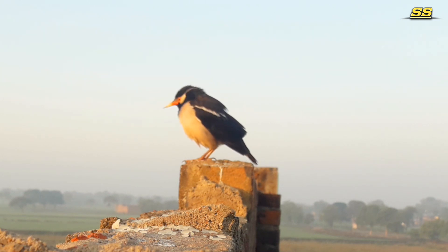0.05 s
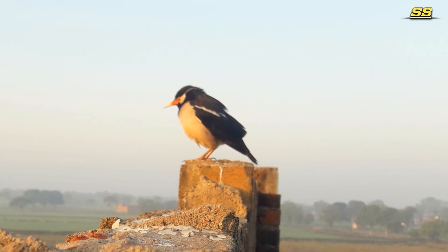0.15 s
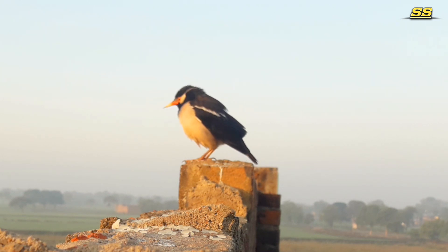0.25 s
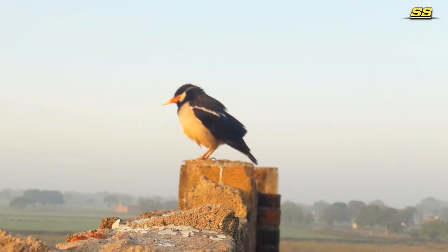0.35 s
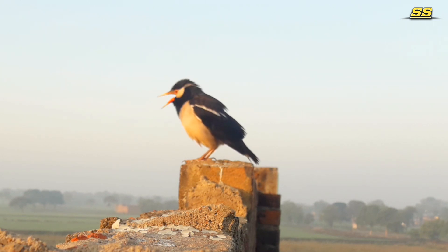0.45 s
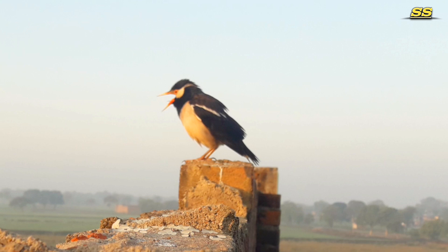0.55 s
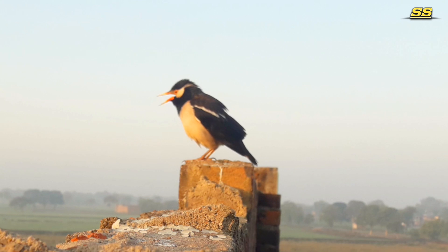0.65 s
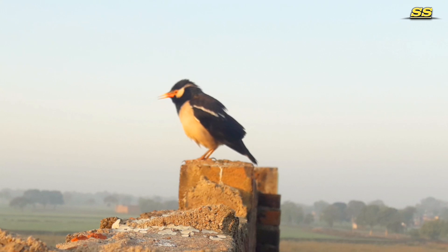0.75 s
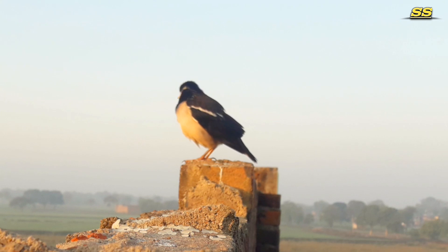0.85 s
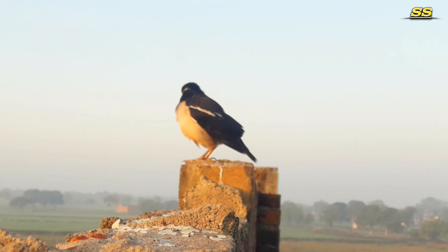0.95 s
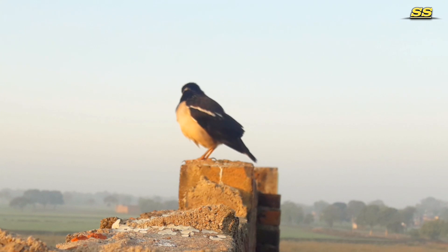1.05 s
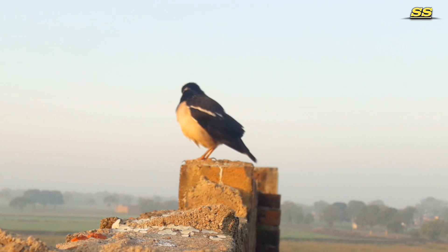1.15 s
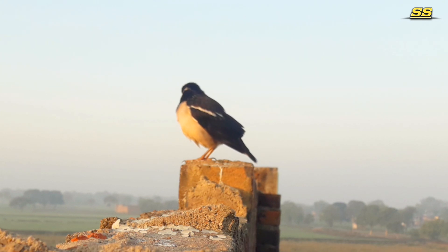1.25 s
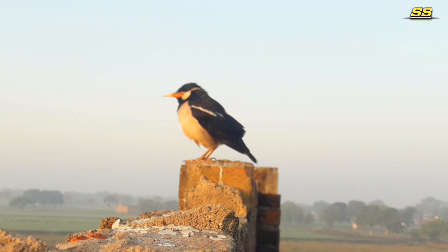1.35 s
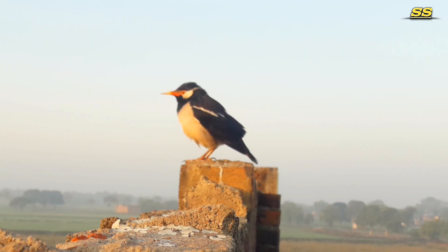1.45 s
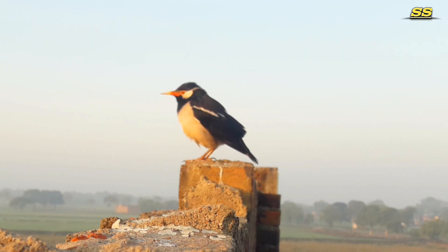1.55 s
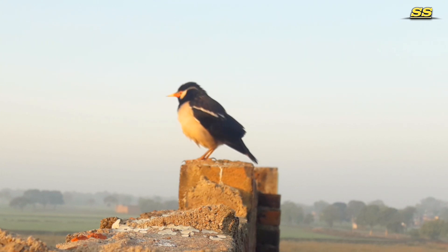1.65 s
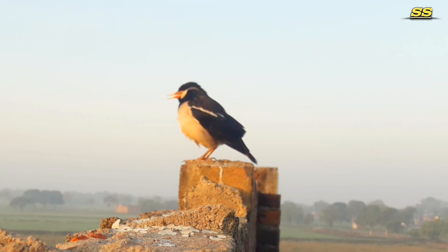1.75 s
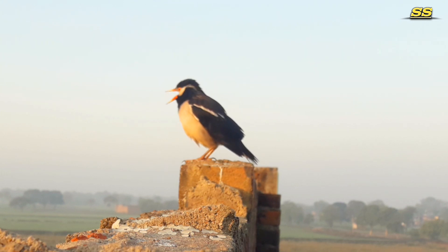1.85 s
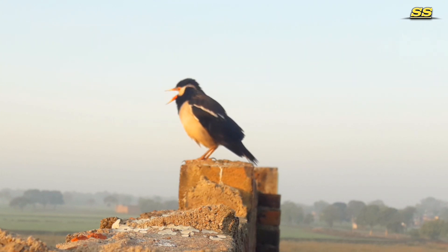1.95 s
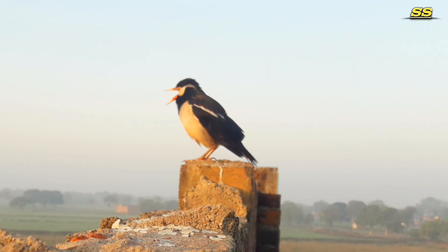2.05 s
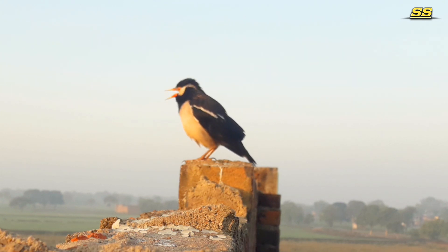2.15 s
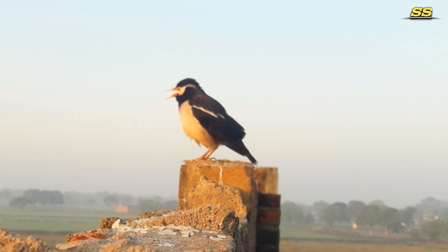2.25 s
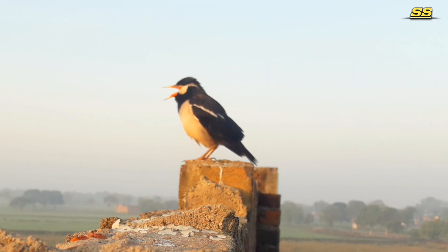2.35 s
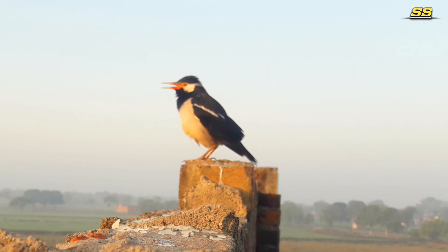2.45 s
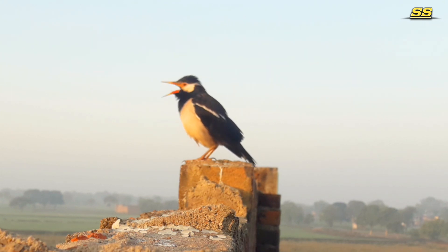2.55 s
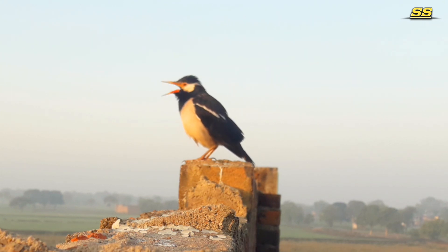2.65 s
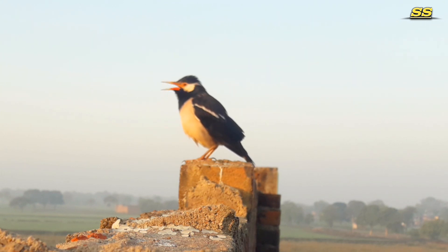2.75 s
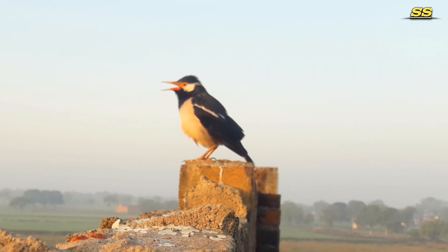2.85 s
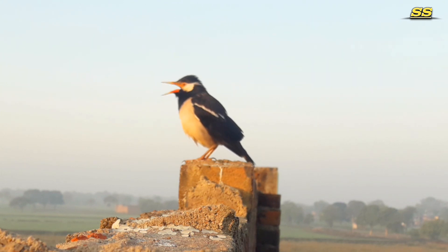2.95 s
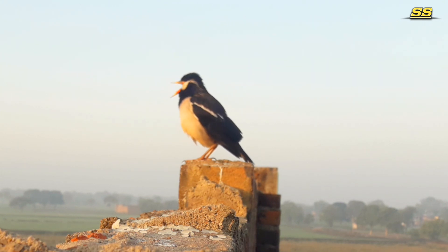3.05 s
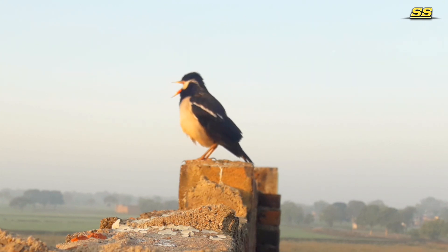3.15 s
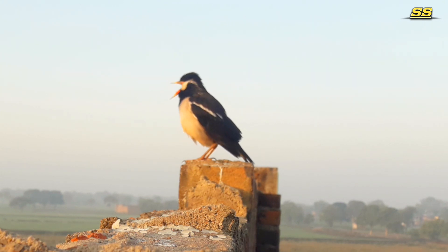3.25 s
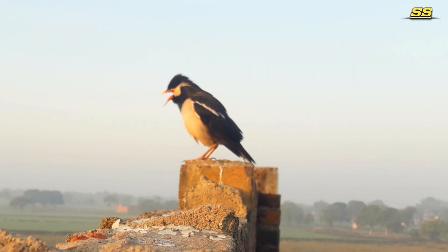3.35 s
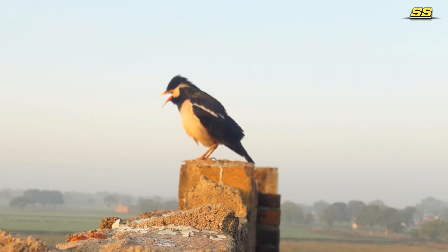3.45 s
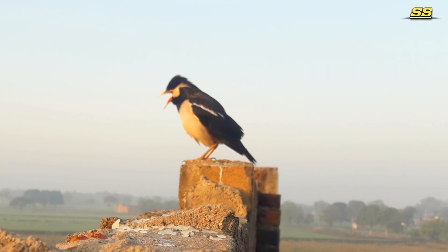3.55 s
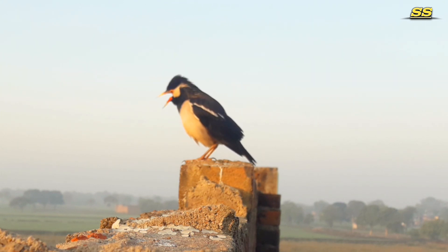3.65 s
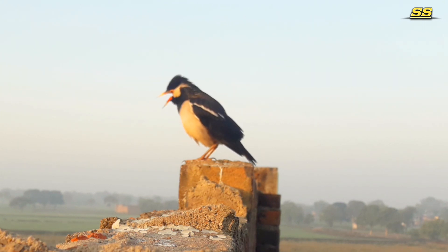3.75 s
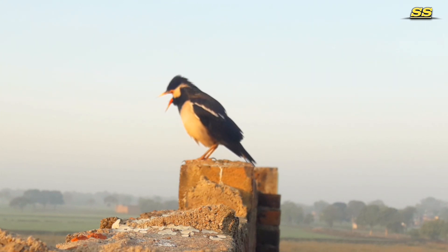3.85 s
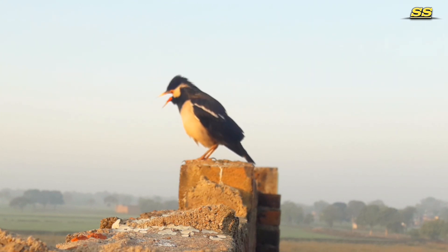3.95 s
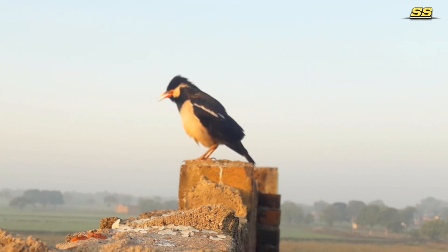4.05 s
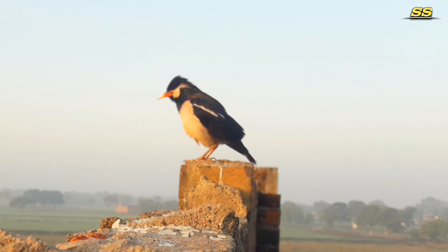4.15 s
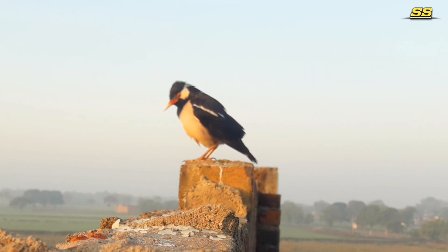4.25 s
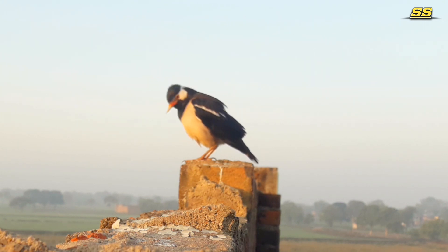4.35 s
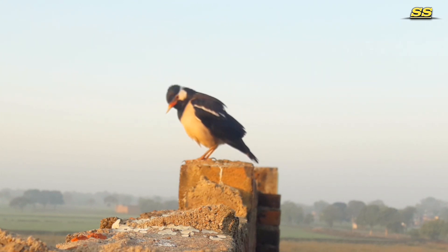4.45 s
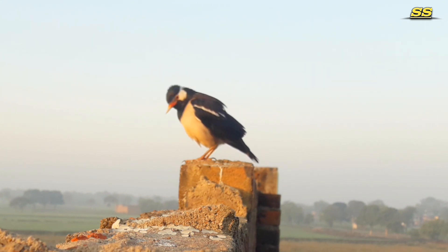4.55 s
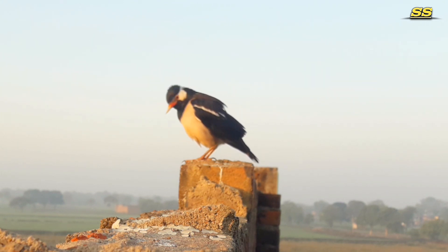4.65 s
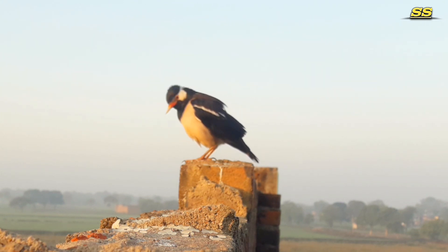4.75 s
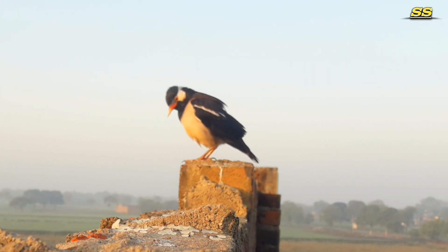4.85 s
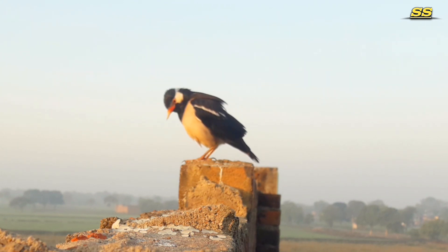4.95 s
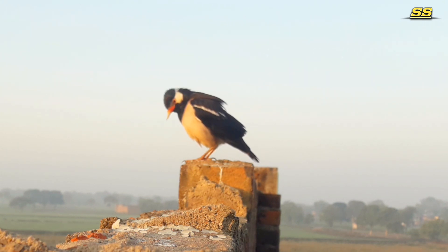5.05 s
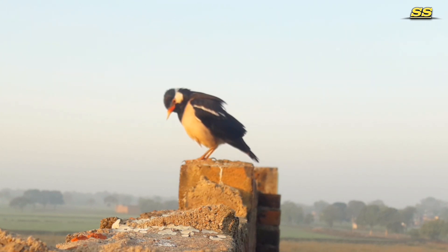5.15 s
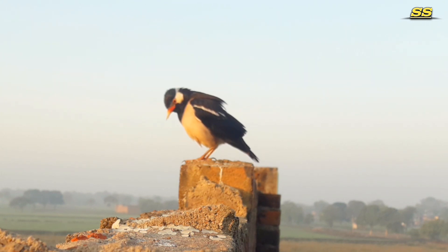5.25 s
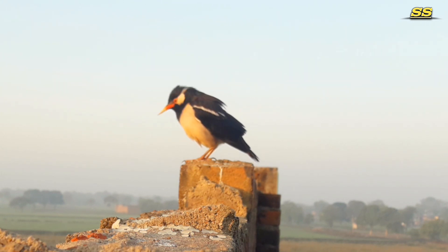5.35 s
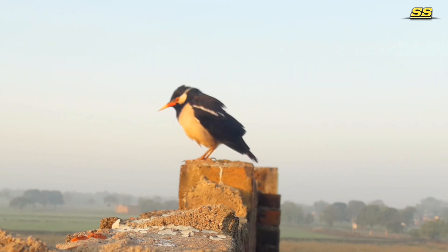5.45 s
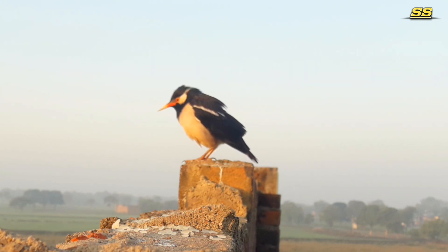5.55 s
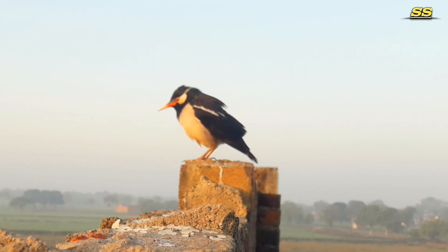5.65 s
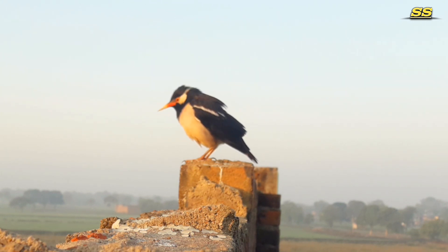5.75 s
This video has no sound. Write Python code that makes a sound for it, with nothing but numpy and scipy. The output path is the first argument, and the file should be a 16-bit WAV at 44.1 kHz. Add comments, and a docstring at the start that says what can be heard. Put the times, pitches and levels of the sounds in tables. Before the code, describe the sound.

A single myna-like bird sings outdoors in short, busy phrases: soft buzz and low trills first, then a slurred whistle into a harsh rasp, bright chips and chatter, paired sliding whistles, another rasp, a nasal buzz and flat pips. After about four seconds it quietens to softer notes. Distant birds twitter faintly over low, airy field noise. Fairly close single microphone, with faint brick echo.

```python
"""A pied myna sings from a brick pillar above open fields: slurred whistles, fast trills, rasps
and a nasal buzz, with soft twitter between. The two sides of its syrinx make gliding tones that
throat and beak colour; a wall throws back a faint echo. Soft, dulled and blurred whistles and
trills sound too, some beneath the near song. Far birds, wandering tones heard through scatter,
and a low rumble of filtered noise fill the pauses."""
import sys
import numpy as np
from scipy import signal
from scipy.fft import rfft, irfft, next_fast_len
from scipy.io import wavfile
from scipy.ndimage import uniform_filter1d

SR = 44100
rng = np.random.default_rng(int(sys.argv[2]) if len(sys.argv) > 2 else 0)


def output_pcm(signal):
    """Save a mono or channel-first signal as 16-bit PCM at the path in sys.argv[1].

    Samples are clipped to [-1, 1] before scaling.
    """
    pcm = np.clip(np.atleast_2d(signal).T, -1, 1) * 32767
    wavfile.write(sys.argv[1], SR, np.round(pcm).astype(np.int16))


N = 256220
TIME = np.arange(N) / SR
PROGRESS = np.linspace(0, 1, 25)  # share of a whistle or trill, from start to end
CUTOFF_HZ = 15900

# What throat and beak let through: (frequency [Hz], gain [dB])
BEAK_RESONANCES = [(400, -60), (1000, -25.5), (1600, -18), (2000, -15), (2500, -3), (3200, 0), (3800, 2.5),
                   (4400, -4), (5200, -10), (6500, -13.5), (8000, -12), (9500, -22.5), (12000, -6),
                   (14500, -24.5), (16000, -7)]

# One cycle of a trill: (share of the cycle [0-1], pitch from low 0 to high 1)
WARBLE_CYCLE = [(0, 0.09), (.2, .42), (0.401, .78), (.54, 0.9), (.66, .62), (.85, 0)]
LILT_CYCLE = [(0, 0.1), (.14, 0), (.32, .9), (.52, 0.98), (0.718, 0.97), (0.868, .2)]

# Trills, clear and dulled: (start [s], length [s], mean rate [cycles/s], final low [Hz], final high [Hz],
# climb to that pitch [octaves], peak effort [dB], dulled and blurred [0 or 1])
WARBLE_TRILLS = [ (.2, .095, 52, 3200, 4400, 0, -39, 1), (1.9615, .236, 31.8, 1885, 3450, 0, -10.5, 0),
                 (4.5, .25, 25, 3800, 5900, 0, -40, 1), (4.79, .26, 24.5, 3150, 4700, -.35, -41, 1), ]
LILT_TRILLS = [ (.14, .155, 48, 1640, 1830, .1, -26, 0), (.705, .153, 26.4, 1620, 2510, .08, -19.5, 0),
               (1.2, .32, 56, 1950, 2550, .95, -27, 1), (2.738, .069, 31.6, 3000, 3820, 0, -21, 0),
               (4.02, .07, 29, 2120, 2590, 0, -33, 0), (4.502, .068, 35, 2500, 3000, -.12, -29, 0),
               (4.597, .163, 25.8, 1590, 2480, .06, -24, 0), (5.54, .27, 28.3, 2240, 2470, 0, -43, 1), ]


def from_db(db):
    """Decibels to gain."""
    return 10 ** (np.asarray(db) / 20)


def rms_one(x):
    """Scale to unit rms."""
    return x / np.sqrt(np.mean(x ** 2) + 1e-20)


def at_hz(points, hz):
    """Gain of a spectrum at the given frequencies, joined up along log frequency."""
    point_hz, db = np.transpose(points)
    return from_db(np.interp(np.log(np.maximum(hz, 1)), np.log(point_hz), db))


def columns(rows, t):
    """Each column of a curve at the times t."""
    s, *values = np.transpose(rows)
    return [np.interp(t, np.sort(s), v) for v in values]


def noise(spectrum, size):
    """Noise of a given colour, rms 1."""
    padded = next_fast_len(size)
    hz = np.arange(padded // 2 + 1) * SR / padded
    coloured = irfft(rfft(rng.standard_normal(padded)) * at_hz(spectrum, hz), padded)
    return rms_one(coloured[:size])


def drift(rate_hz, size):
    """Smooth chance with spread near 1: white noise through two equal low-pass poles."""
    pole = np.exp(-2 * np.pi * rate_hz / SR)
    white = rng.standard_normal(size + SR // 4)  # a quarter second of run-in
    return rms_one(signal.lfilter([1], [1, -2 * pole, pole * pole], white))[-size:]


def tail(t60_s):
    """The diffuse answer of ground and trees to a click: decaying noise with unit energy."""
    decay = from_db(-60 * TIME[:SR] / t60_s)
    return rms_one(rng.standard_normal(SR) * decay) / np.sqrt(SR)


def country_air():
    """Steady outdoor air at the microphone: coloured noise whose level slowly shifts."""
    # (frequency [Hz], relative density [dB per Hz])
    air_spectrum = [(25, -36), (55, -15.5), (90, -4.5), (200, -2), (320, -9), (420, -7), (1000, -16.5),
                    (1500, -16.5), (2200, -24.5), (3200, -27.5), (5500, -26.5), (7000, -31.5),
                    (8000, -51.5), (16000, -47.5)]
    # (time [s], level before the lift [dB])
    air_level = [(0.0, -49), (4.22, -54), (5.81, -51.5)]
    lift_db = 2.5
    return from_db(columns(air_level, TIME)[0] + lift_db) * noise(air_spectrum, N)


def far_engine():
    """The low rumble of a far engine: noise in a narrow band around 100 Hz."""
    # (time [s], level [dB])
    rumble_level = [(0, -59), (3.5, -61), (4.6, -53), (5.8, -51.5)]
    band = [(80, -37), (96, -5), (104, 8), (112, -13.5), (135, -92)]  # (Hz, dB)
    return from_db(columns(rumble_level, TIME)[0]) * noise(band, N)


def far_bird(hz):
    """A distant twitter: a tone that wanders and flickers, heard only through scatter."""
    wander, flutter_db, t60_s = .08, 4.0, .33
    pitch = hz * np.exp(wander * drift(11, N))
    phase = 2 * np.pi * np.cumsum(pitch) / SR
    twitter = np.sin(phase) * from_db(flutter_db * drift(7.5, N))
    return signal.fftconvolve(twitter, tail(t60_s))[:N]


def far_chorus():
    """Three distant twitters blend and come and go together."""
    # (time [s], level [dB])
    chorus_level = [(0, -39.5), (.75, -45), (1.2, -57), (2.9, -43), (4.3, -48), (5.1, -54), (5.6, -55)]
    birds = sum(far_bird(hz) for hz in (2900, 3600, 4400))
    return from_db(columns(chorus_level, TIME)[0]) * rms_one(birds)


def background():
    """Country air, a far engine's drone and distant birds."""
    return country_air() + far_engine() + far_chorus()


def span(rows, edge_s=.002):
    """The samples that a gesture covers, and the soft opening and closing of the syrinx."""
    start, end = rows[0][0], rows[-1][0]
    end = max(end, start + .004)
    first = max(int((start - edge_s) * SR), 0)
    last = min(int((end + edge_s) * SR), N)
    at = np.arange(first, last)
    gate = np.clip(np.minimum(at - at[0], at[-1] - at) / (2 * edge_s * SR), 0, 1)
    return at, np.sin(np.pi / 2 * gate) ** 2


def syrinx(pitch, effort_db, overtone_db, slope_db, jitter):
    """A slightly unsteady tone; each harmonic swells and fades as it glides through the beak's resonances."""
    shimmer_db = 2.3
    size = len(pitch)
    pitch = uniform_filter1d(pitch, size=36) * (1 + jitter * drift(350, size))
    phase = 2 * np.pi * np.cumsum(pitch) / SR
    tone = at_hz(BEAK_RESONANCES, pitch) * np.sin(phase)
    for k in range(2, 8):
        # slope_db is per octave above the second harmonic
        strength = from_db(overtone_db + slope_db * np.log2(k / 2)) * (k * pitch < CUTOFF_HZ)
        tone += strength * at_hz(BEAK_RESONANCES, k * pitch) * np.sin(k * phase)
    return tone * from_db(effort_db + shimmer_db * drift(133, size))


def whistles(notes, overtone_db, slope_db, jitter):
    """Pure glides, one after another or from both sides of the syrinx at once."""
    out = np.zeros(N)
    for rows in notes:
        at, gate = span(rows)
        pitch, effort_db = columns(rows, TIME[at])
        out[at] += gate * syrinx(pitch, effort_db, overtone_db, slope_db, jitter)
    return out


def trills(bout_list, shape, overtone_db, slope_db, jitter, swell_db):
    """The muscles repeat one pitch gesture; air pressure varies with it, and turbulence adds a little hiss."""
    hiss_db = -36.0
    out = np.zeros(N)
    for rows in bout_list:
        at, gate = span(rows)
        rate, low, high, effort_db = columns(rows, TIME[at])
        # the count of cycles is zero at the start of the bout
        cycles = np.cumsum(rate) / SR - rate[0] * (rows[0][0] - TIME[at[0]])
        height = np.interp(cycles, *np.transpose(shape), period=1)
        pitch = low + (high - low) * height
        pressure_db = effort_db + swell_db * (height - .5)
        tone = syrinx(pitch, pressure_db, overtone_db, slope_db, jitter)
        hiss = from_db(effort_db + hiss_db) * noise(BEAK_RESONANCES, len(at))
        out[at] += gate * (tone + hiss)
    return out


def swell(peak_at, rise_db, fall_db):
    """Effort over one breath of song: it builds to a peak and eases off."""
    return np.interp(PROGRESS, [0, np.clip(peak_at, .05, .95), 1], [-rise_db, 0, -fall_db])


def arcs(dulled, peak_at=.55, rise_db=8.0, fall_db=8.0):
    """Pitch bends along a parabola under one swell: notes of (s, Hz, dB)."""
    # Plain whistles, clear and dulled, that may overlap: (start [s], length [s], first pitch [Hz],
    # middle pitch [Hz], last pitch [Hz], peak effort [dB], dulled and blurred [0 or 1])
    plain_whistles = [ (.495, .038, 3800, 4100, 4200, -17, 0), (1.33, .08, 6430, 5650, 4500, -43, 1),
                      (1.935, .021, 4520, 4400, 4380, 1, 0), (2.28, .073, 2220, 2390, 2450, -21, 0),
                      (2.545, .027, 4900, 4950, 4850, -19, 0), (2.571, .022, 4850, 4600, 4300, -10, 0),
                      (3.277, .007, 2000, 3500, 6000, -15, 0), (3.292, .024, 3500, 3450, 3250, -10, 0),
                      (3.317, .022, 3000, 2790, 3050, -14, 0), (3.338, .009, 3050, 3400, 4800, -8, 0),
                      (3.51, .09, 4420, 4290, 4250, -36, 0), (3.797, .055, 5100, 5700, 4950, -17, 0),
                      (4.098, .028, 2520, 2790, 2620, -23, 0), (4.145, .06, 2880, 3040, 2960, -23, 0),
                      (4.451, .052, 3500, 4250, 3850, -18, 0), (4.505, .065, 4250, 4195, 4150, -27, 0),
                      (5.16, .15, 2740, 2890, 2920, -53, 1), (5.35, .21, 2760, 2820, 2790, -52, 1),
                      (5.615, .035, 3680, 3630, 3580, -49, 1), ]
    notes = []
    for s, length, *pitches, db, is_dulled in plain_whistles:
        if is_dulled == dulled:
            pitch = np.polyval(np.polyfit([0, .5, 1], pitches, 2), PROGRESS)
            effort_db = db + swell(peak_at, rise_db, fall_db)
            notes.append(np.transpose([s + length * PROGRESS, pitch, effort_db]))
    return notes


def bouts(events, dulled, quicken, settle, peak_at, rise_db, fall_db):
    """Under one swell a trill shifts pace and bends to its pitch: bouts of (s, cycles/s, low Hz, high Hz, dB)."""
    out = []
    for s, length, rate, low, high, climb, db, is_dulled in events:
        if is_dulled == dulled:
            lift = 2 ** (-climb * (1 - PROGRESS) ** settle)
            pace = rate * (1 + quicken * (PROGRESS - .5))
            effort_db = db + swell(peak_at, rise_db, fall_db)
            out.append(np.transpose([s + length * PROGRESS, pace, low * lift, high * lift, effort_db]))
    return out


def dulled_calls():
    """Soft, dulled and blurred whistles and trills, some beneath the near song: low-passed tones with scatter."""
    direct_db, scatter_db, t60_s, dull_hz = -.5, -6.5, .3, 7500
    song = whistles(arcs(dulled=True), overtone_db=-26.0, slope_db=-12.0, jitter=.003)
    for events, shape in ((WARBLE_TRILLS, WARBLE_CYCLE), (LILT_TRILLS, LILT_CYCLE)):
        calls = bouts(events, dulled=True, quicken=.01, settle=.9, peak_at=.72, rise_db=4.0, fall_db=7.0)
        song += trills(calls, shape, overtone_db=-26.0, slope_db=-14.0, jitter=.012, swell_db=3.0)
    scattered = signal.fftconvolve(song, tail(t60_s))[:N]
    heard = from_db(direct_db) * song + from_db(scatter_db) * scattered
    return signal.sosfilt(signal.butter(2, dull_hz, fs=SR, output="sos"), heard)


def syllables(shape, events):
    """One learnt gesture, stretched and transposed for each use: notes of (s, Hz, dB)."""
    notes = []
    for s, length, hz, db in events:
        notes.append([(s + share * length, hz * ratio, db + shape_db) for share, ratio, shape_db in shape])
    return notes


def learnt_whistles():
    """Five kinds of whistled syllable, each a fixed pitch and effort gesture of the syrinx."""
    # Gestures: (share of the length, ratio to the main pitch, effort change [dB])
    slur_shape = [(0, 1.34, -2), (.06, .94, -12), (.2, 1.04, 0), (.32, 1.45, -3), (.4, 1, 2),
                  (.56, .99, -3), (.61, .83, -7), (.82, .76, -9), (1, .5, -18)]  # two peaks, then down in steps
    chip_shape = [(-.25, .33, -28), (0, 1, -4), (.22, .78, 0), (.45, .54, -21), (1, .33, -32)]  # a sharp peak that falls away
    pip_shape = [(0, .75, -8), (.17, 1, -1), (.55, 1, 0), (.84, .98, -1), (1, .77, -8)]  # a flat note that sags at both ends
    scoop_shape = [(0, .44, -10), (.42, .78, -3.5), (.78, .98, 0), (1, 1, -5)]  # the swelling rise that leads into a rasp
    tew_shape = [(-.14, .55, -15), (-.06, .9, -4), (0, 1.74, -6), (.15, 1.17, -4), (.21, 1, 0),
                 (.47, .96, 0), (.68, .82, 1), (.8, .6, -6), (1, .41, -10)]  # a flick up, a short plateau and a long slide down
    # Their uses: (time [s], length [s], main pitch [Hz], effort before the gesture's change [dB])
    slur_notes = [(.404, .076, 4700, -10), (4.361, .076, 4630, -11)]
    chip_notes = [(.392, .008, 6000, -23), (1.594, .02, 6600, -12.5), (1.618, .023, 6880, -6),
                  (1.877, .006, 5400, -16), (3.284, .028, 6300, -15), (4.351, .008, 6100, -16)]
    pip_notes = [(1.698, .025, 3300, -13), (1.724, .019, 3280, -12), (1.744, .014, 3260, -14),
                 (1.759, .014, 3230, -17), (3.419, .028, 2760, -6.5), (3.448, .022, 2720, -7),
                 (3.471, .023, 2820, -5.5)]
    scoop_notes = [(.476, .027, 2400, -7), (2.527, .031, 2310, -4.5), (3.797, .032, 2260, -6)]
    tew_notes = [(2.36, .055, 3560, -11), (2.428, .05, 3480, -10.5), (3.627, .056, 3480, -11.5),
                 (3.699, .053, 3400, -10.5)]
    slurs_and_chips = syllables(slur_shape, slur_notes) + syllables(chip_shape, chip_notes)
    pips = syllables(pip_shape, pip_notes)
    scoops = syllables(scoop_shape, scoop_notes)
    tews = syllables(tew_shape, tew_notes)
    song = whistles(slurs_and_chips, overtone_db=-16.5, slope_db=-10.0, jitter=.008)
    song += whistles(pips, overtone_db=-16.0, slope_db=-6.5, jitter=.007)
    song += whistles(scoops, overtone_db=-25.0, slope_db=-8.5, jitter=.011)
    song += whistles(tews, overtone_db=-9.0, slope_db=-7.0, jitter=.005)
    return song


def near_trills():
    """Rasps, chatters, warbles and lilts: four pitch gestures, each repeated fast by the syrinx muscles."""
    # One cycle: (share of the cycle [0-1], pitch from low 0 to high 1)
    rasp_cycle = [(0, 1), (.14, .45), (.26, 0.12), (0.4, 0.24), (0.55, 0.07), (0.7, 0.02), (.81, 0.13),
                  (0.93, .40)]
    chatter_cycle = [(0, 0.99), (0.141, 0.88), (0.321, .12), (.45, .22), (.62, 0), (.76, .06), (0.879, 0.5)]
    # Trills, with the columns of WARBLE_TRILLS: (start [s], length [s], mean rate [cycles/s],
    # final low [Hz], final high [Hz], climb [octaves], peak effort [dB], dulled and blurred [0 or 1])
    rasp_trills = [ (.503, .194, 72, 2700, 6150, .22, -7.8, 0), (2.559, .168, 71.8, 2730, 6150, .2, -7, 0),
                   (3.827, .18, 71.8, 2640, 6050, .17, -11, 0), ]
    chatter_trills = [ (.305, .071, 36.5, 2730, 4200, 0, -27, 0), (1.651, .038, 82, 4300, 6800, 0, -4.5, 0),
                      (1.884, .05, 85.5, 4480, 7050, 0, -6, 0), (3.349, .067, 62.2, 3740, 6550, 0, -7, 0), ]
    rasps = bouts(rasp_trills, dulled=False, quicken=.11, settle=2.2, peak_at=.7, rise_db=4.5, fall_db=1.0)
    song = trills(rasps, rasp_cycle, overtone_db=-8.5, slope_db=-6.5, jitter=.013, swell_db=-2.5)
    chatters = bouts(chatter_trills, dulled=False, quicken=.01, settle=1.0, peak_at=.65, rise_db=7.0, fall_db=3.0)
    song += trills(chatters, chatter_cycle, overtone_db=-12.0, slope_db=-6.5, jitter=.018, swell_db=-5.0)
    warbles = bouts(WARBLE_TRILLS, dulled=False, quicken=-.025, settle=1.0, peak_at=.4, rise_db=1.2, fall_db=2.5)
    song += trills(warbles, WARBLE_CYCLE, overtone_db=-9.5, slope_db=-10.5, jitter=.016, swell_db=4.0)
    lilts = bouts(LILT_TRILLS, dulled=False, quicken=-.04, settle=1.5, peak_at=.62, rise_db=5.5, fall_db=4.5)
    song += trills(lilts, LILT_CYCLE, overtone_db=-19.0, slope_db=-17.0, jitter=.012, swell_db=7.0)
    return song


def buzzes():
    """A reedy tone that breaks, pulse by pulse, into period doubling: half-harmonics and hiss burst between its lines."""
    # Nasal buzzes, one list each: (time [s], rate [pulses/s], pitch [Hz], tone [dB], rattle [dB])
    buzz_curves = [
        [(0, 160, 2041, -31.5, -31), (.11, 160, 2045, -35, -31.5), (.135, 190, 2080, -54, -50)],
        [(2.977, 137, 2020, -31, -30), (3.002, 135, 2124, -19, -22), (3.05, 135, 2250, -14, -22),
         (3.16, 132, 2350, -15.5, -19.5), (3.223, 117, 2290, -17, -20.5)],
    ]
    # (frequency [Hz], gain [dB])
    rattle_spectrum = [(400, -63), (1100, -20.5), (1600, -26), (3400, 0), (4500, -3), (5600, -17),
                       (7200, -20.5), (9500, -32), (12000, -22.5), (16000, -34)]
    bend, pulse_sharpness, choke, hiss_db = .035, 1.54, .57, -1.0
    out = np.zeros(N)
    for rows in buzz_curves:
        at, gate = span(rows)
        size = len(at)
        rate, pitch, tone_db, rattle_db = columns(rows, TIME[at])
        beat = 2 * np.pi * np.cumsum(rate * (1 + .02 * drift(60, size))) / SR
        pulse = np.exp(pulse_sharpness * (np.cos(beat) - 1))
        bent_pitch = pitch * (1 - bend * np.sin(beat))
        tone = syrinx(bent_pitch, tone_db, overtone_db=-1.0, slope_db=-14.0, jitter=.012)
        phase = 2 * np.pi * np.cumsum(pitch * (1 + .045 * drift(205, size))) / SR
        halves = np.zeros(size)
        for order in np.arange(6) + .5:
            halves += at_hz(rattle_spectrum, order * pitch) * np.sin(order * phase)
        hiss = from_db(hiss_db) * noise(rattle_spectrum, size)
        rattle = from_db(rattle_db) * pulse * (halves + hiss)
        # each burst of rattle chokes the tone
        out[at] += gate * (tone * (1 - choke * pulse) + rattle)
    return out


def myna():
    """The bird on the pillar: whistles, learnt syllables, four kinds of trill and the buzz."""
    song = whistles(arcs(dulled=False), overtone_db=-16.0, slope_db=-9.0, jitter=.004)
    return song + learnt_whistles() + near_trills() + buzzes()


def fields(song):
    """A few distinct echoes off brickwork, then thin scatter from the land around."""
    # (delay [s], level before dulling [dB])
    brick_echoes = [(.012, -13.5), (0.043, -20), (.083, -21)]
    scatter_db, t60_s, dull_hz = -21.0, .72, 8000
    response = from_db(scatter_db) * tail(t60_s)
    for delay, db in brick_echoes:
        response[int(delay * SR)] += from_db(db)
    dull = signal.butter(1, dull_hz, fs=SR, output="sos")
    reflected = signal.fftconvolve(song, response)[:N]
    return song + signal.sosfilt(dull, reflected)


def scene():
    """The whole song in its landscape, at one microphone."""
    return (background() + dulled_calls() + fields(myna()))[None]


def record(dry):
    """The top is cut steeply."""
    return signal.sosfilt(signal.ellip(10, .1, 80, CUTOFF_HZ, fs=SR, output="sos"), dry)


dry = scene()
out = record(dry)
output_pcm(out)
```